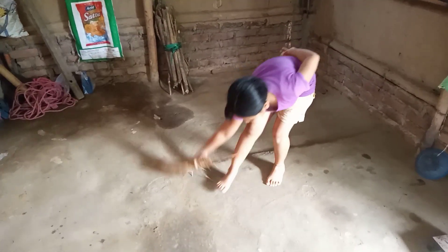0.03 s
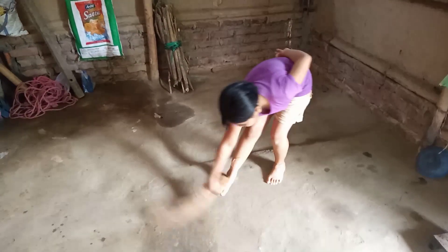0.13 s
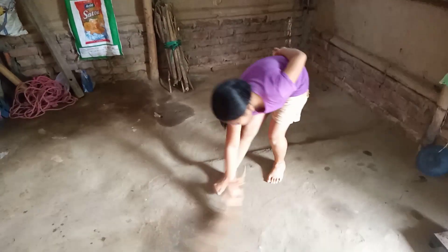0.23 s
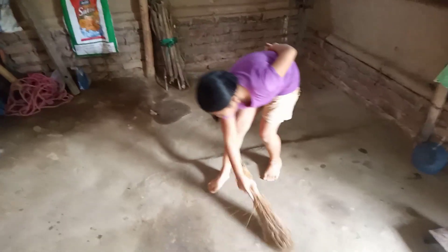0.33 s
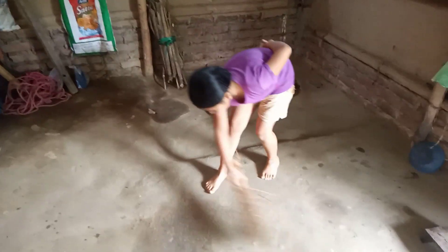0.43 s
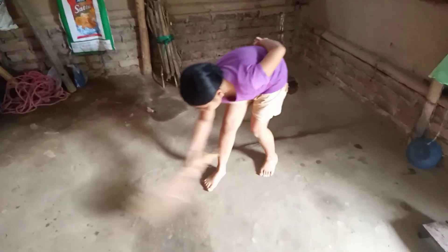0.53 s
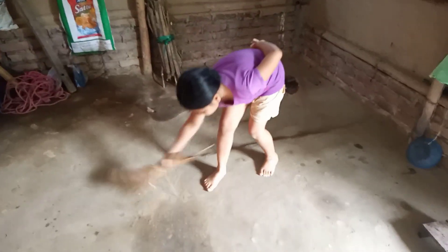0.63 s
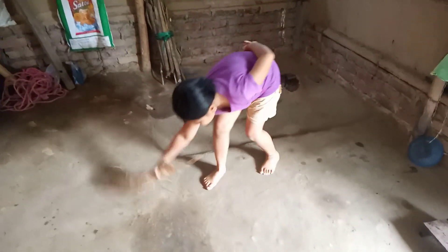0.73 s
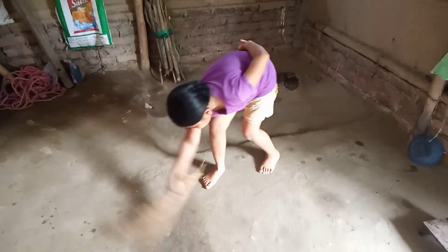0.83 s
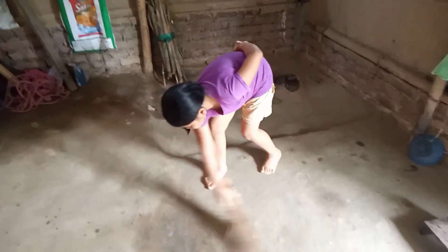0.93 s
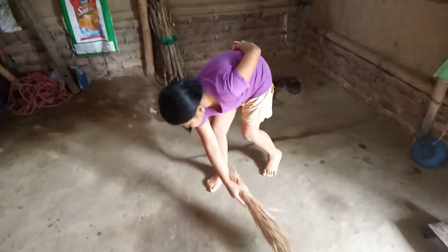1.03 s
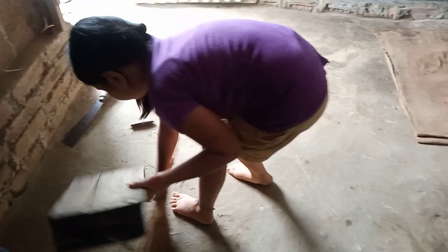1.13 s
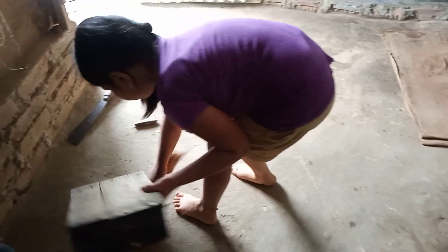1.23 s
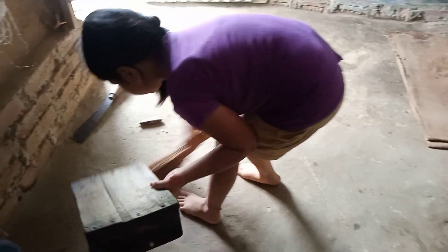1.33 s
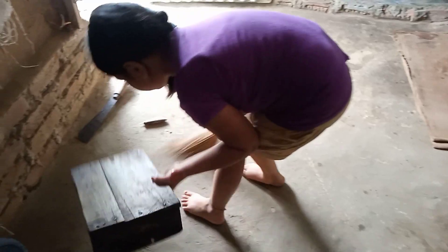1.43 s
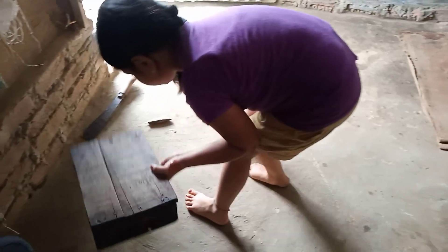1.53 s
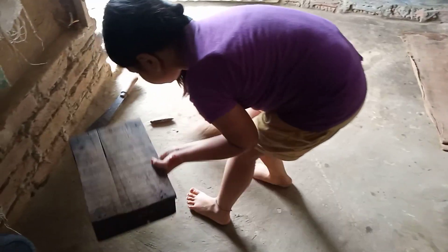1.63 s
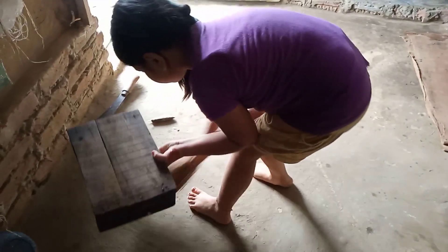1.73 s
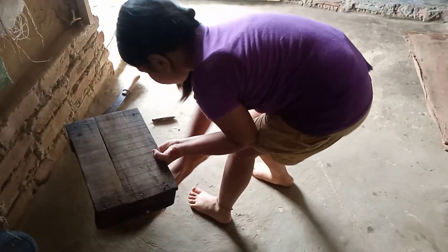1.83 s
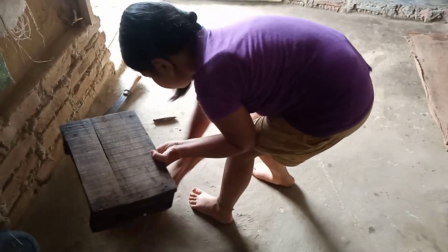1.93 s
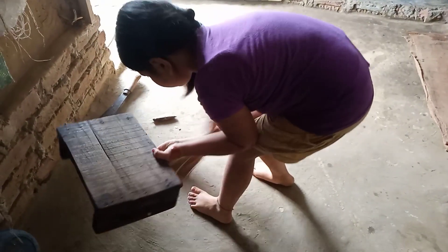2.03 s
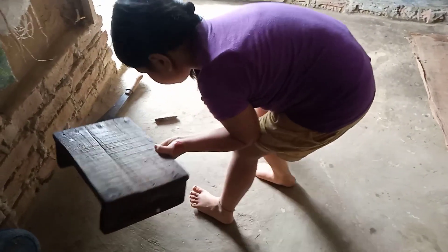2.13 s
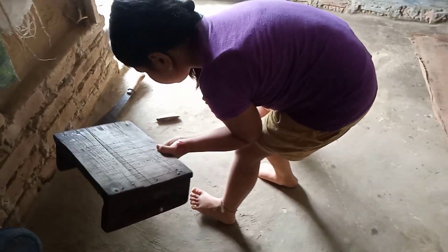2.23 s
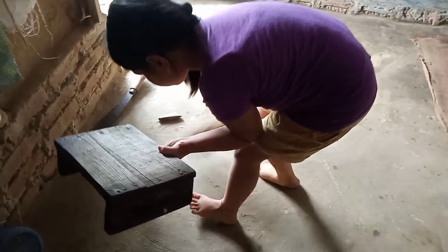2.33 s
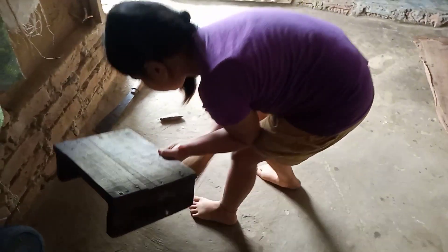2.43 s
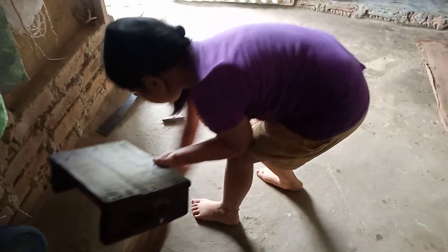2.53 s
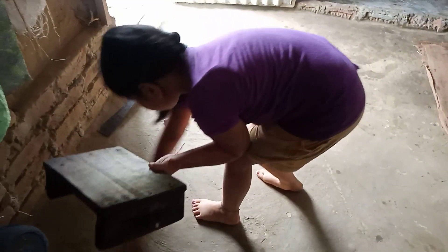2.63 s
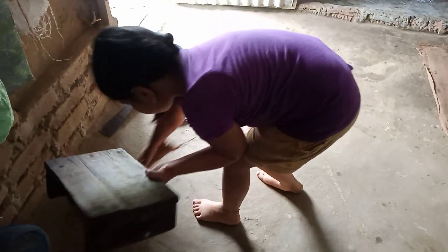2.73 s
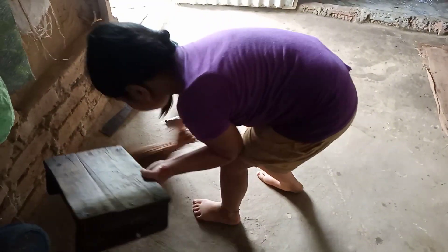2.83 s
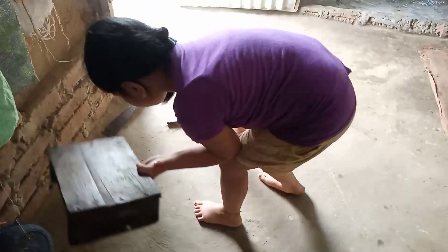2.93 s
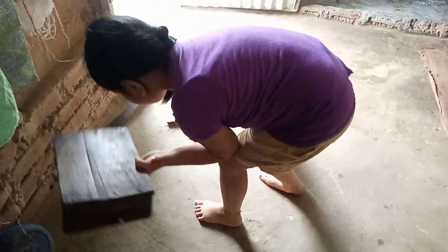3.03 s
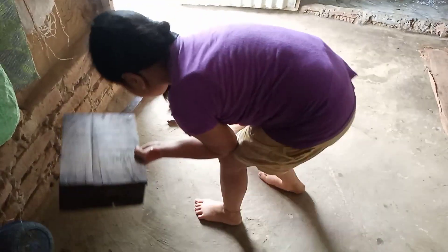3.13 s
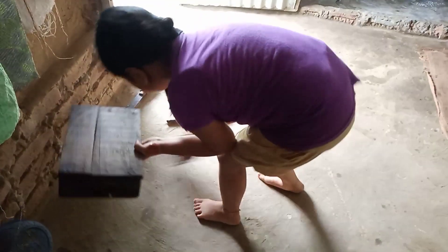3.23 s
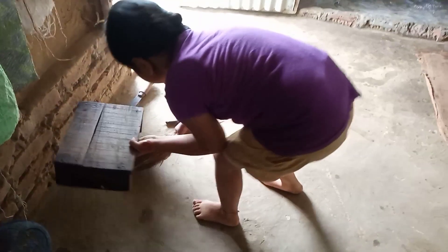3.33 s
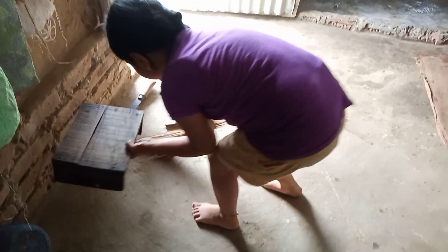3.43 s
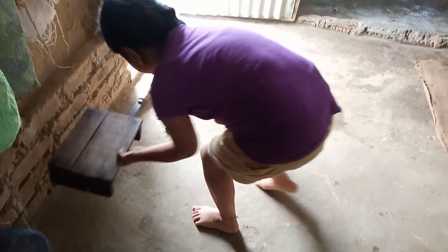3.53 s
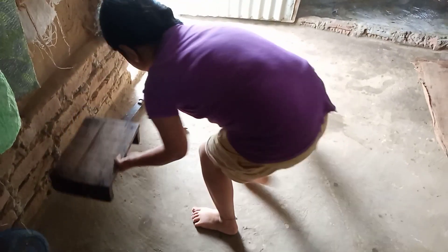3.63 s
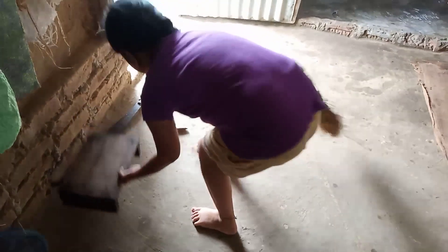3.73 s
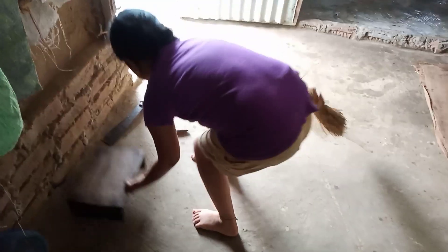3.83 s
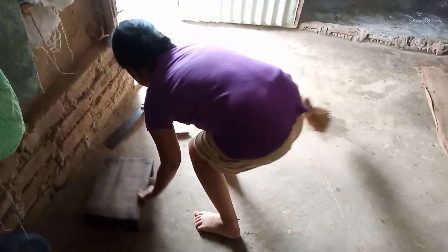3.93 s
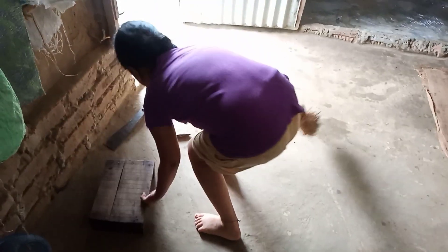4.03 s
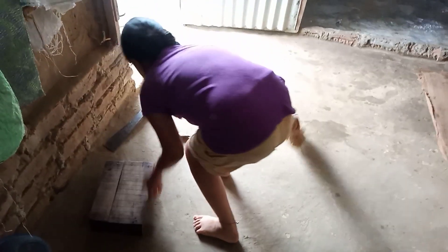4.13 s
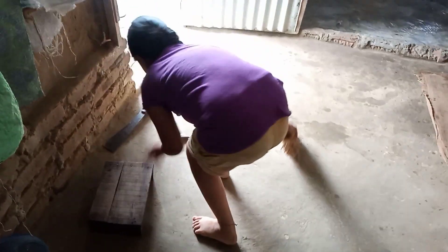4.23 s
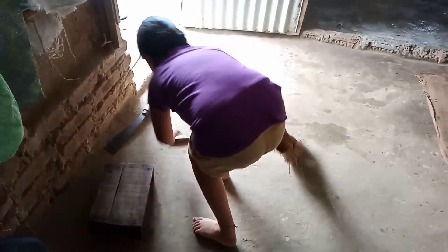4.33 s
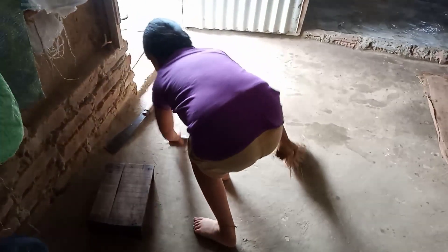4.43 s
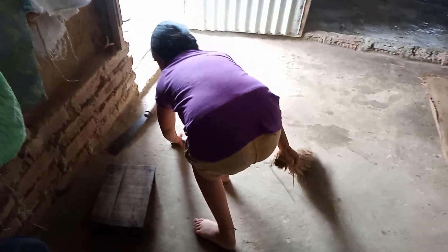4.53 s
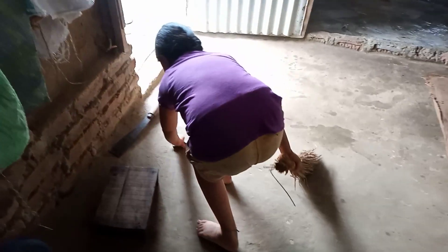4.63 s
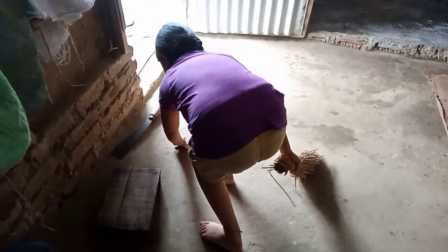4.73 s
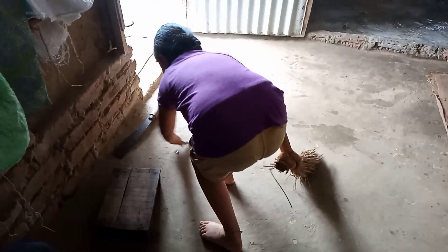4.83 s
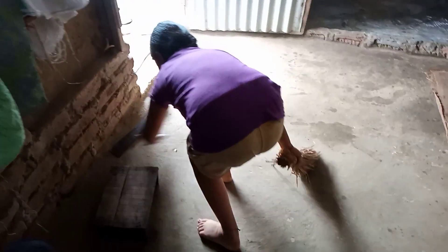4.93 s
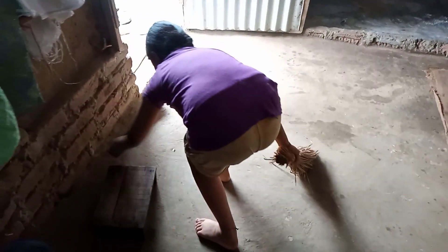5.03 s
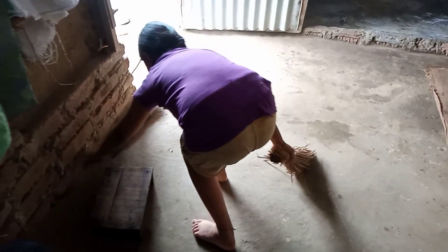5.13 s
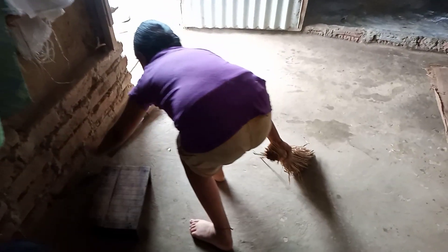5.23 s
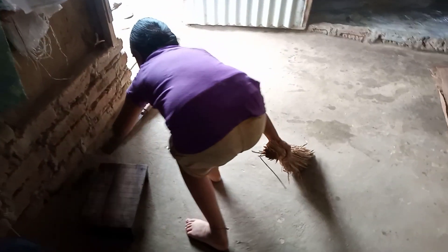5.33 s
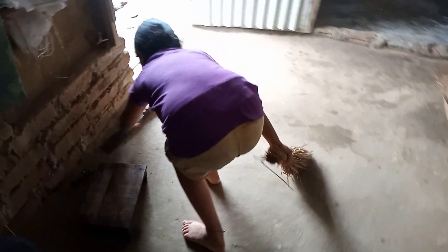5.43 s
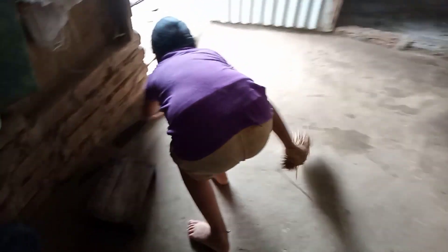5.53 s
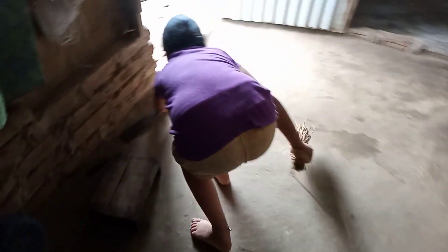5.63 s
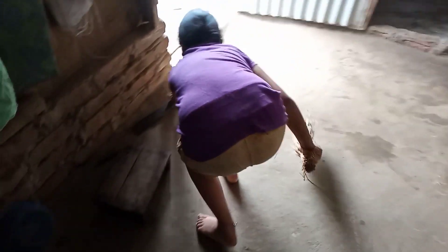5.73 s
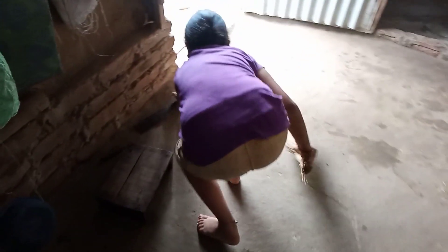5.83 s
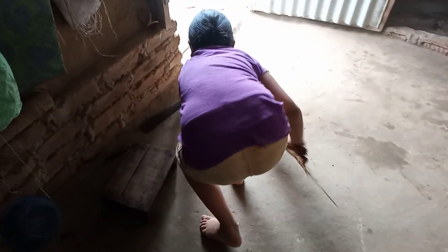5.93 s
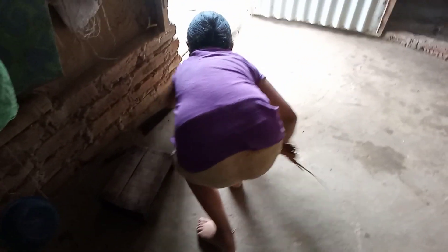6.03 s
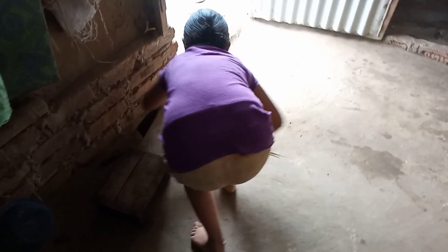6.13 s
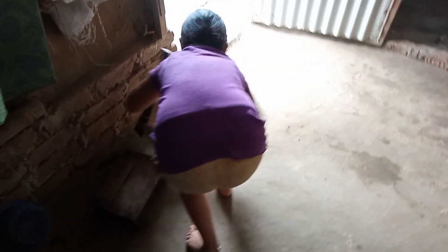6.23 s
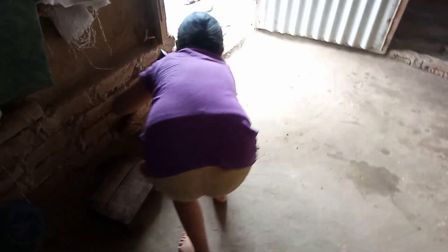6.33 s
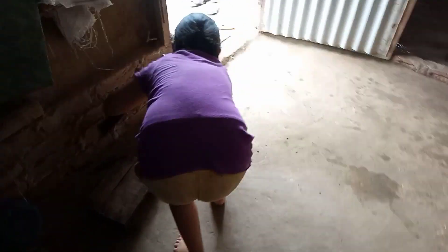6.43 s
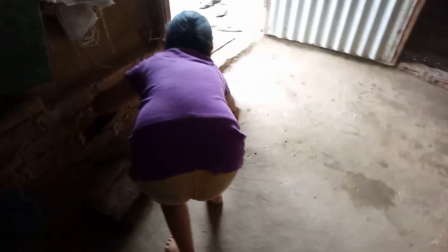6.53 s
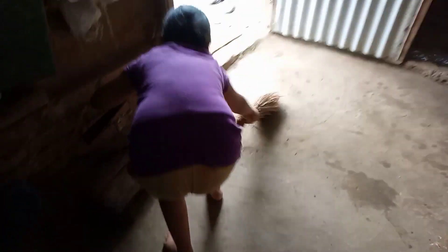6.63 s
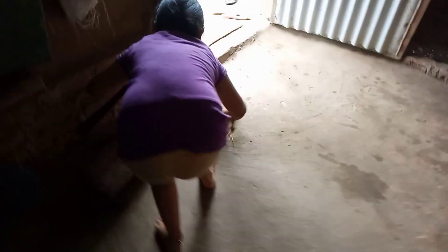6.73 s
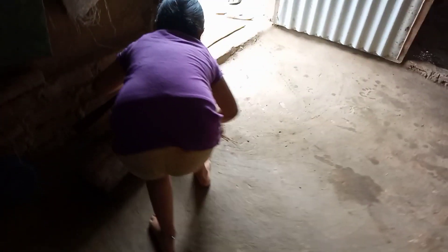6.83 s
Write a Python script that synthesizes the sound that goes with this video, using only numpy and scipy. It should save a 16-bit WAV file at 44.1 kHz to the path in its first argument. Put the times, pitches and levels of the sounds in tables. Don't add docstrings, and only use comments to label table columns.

```python
import sys
import numpy as np
from scipy import signal
from scipy.fft import rfft, irfft
from scipy.io import wavfile
from scipy.ndimage import uniform_filter1d

SR = 44100
rng = np.random.default_rng(int(sys.argv[2]) if len(sys.argv) > 2 else 0)


def put_to_file(sound):
    columns = np.atleast_2d(sound).T
    safe = np.clip(columns, -1, 1)
    whole_steps = np.round(safe * 32767)
    wavfile.write(sys.argv[1], SR, whole_steps.astype(np.int16))


def field_ratio(decibels):
    return 10 ** (np.asarray(decibels, dtype=float) / 20)


N = 303844
SECOND_SHOT_S, SWEEP_ENDS_S = 1.308, 3.93


def unit(x):
    return x / np.sqrt(np.mean(x ** 2))


def band(x, lo_hz, hi_hz):
    sos = signal.butter(3, [lo_hz, min(hi_hz, .45 * SR)], "band", fs=SR, output="sos")
    return unit(signal.sosfilt(sos, x))


def colour(x, spectrum):
    hz, db = np.transpose(spectrum)
    log_hz = np.log(np.fft.rfftfreq(N, 1 / SR) + 1)
    return irfft(rfft(x) * field_ratio(np.interp(log_hz, np.log(hz), db)), N)


def walk(rate_hz):
    size = int(SR / rate_hz)
    return unit(uniform_filter1d(uniform_filter1d(rng.standard_normal(N), size), size))


def add(out, s, x):
    i = int(s * SR)
    out[i:i + len(x)] += x[:max(N - i, 0)]


def strike(modes, contact_ms, db, crack_db, crack_t60, crack_hz, split=0.):
    t = np.arange(SR // 2) / SR
    ring = 0
    for hz, level_db, t60 in modes:
        twin_hz = hz * (1 + split * rng.standard_normal())
        pair = np.sin(2 * np.pi * hz * t) + 1.66 * np.sin(2 * np.pi * twin_hz * t)
        ring = ring + field_ratio(level_db - 60 * t / t60) * pair
    contact_force = np.hanning(int(contact_ms * SR / 1000) + 3)
    ring = signal.fftconvolve(ring, contact_force)[:len(t)]
    grit = rng.standard_normal(len(t)) * field_ratio(-60 * t / crack_t60)
    low_pass = signal.butter(4, min(crack_hz, .45 * SR), fs=SR, output="sos")
    crack = signal.sosfilt(low_pass, grit)
    return field_ratio(db) * (ring / np.abs(ring).max() + field_ratio(crack_db) * crack / np.abs(crack).max())


def tail(x, t60, wet_db, top_hz):
    t = np.arange(SR // 2) / SR
    cloud = rng.standard_normal(len(t)) * field_ratio(-60 * t / t60) * np.minimum(t / 0.0024, 1)
    cloud = signal.lfilter(*signal.butter(2, top_hz, fs=SR), cloud)
    return x + field_ratio(wet_db) * signal.fftconvolve(x, cloud / np.sqrt(np.sum(cloud ** 2)))[:N]


def whistle(hz):
    u = np.linspace(0, 1, len(hz))
    return np.sin(np.pi * u ** .8) * np.sin(2 * np.pi * np.cumsum(hz) / SR)


def chirps(table, hoarse_db):
    out, rasp = np.zeros(N), walk(240)
    for s, length, hz0, hz1, db in table:
        size = int(length * SR)
        wobble = rasp[int(s * SR) - size:][:size]
        pitch_hz = np.linspace(hz0, hz1, size) * (1 + 0.0032 * hoarse_db * wobble)
        add(out, s, field_ratio(db + hoarse_db * wobble) * whistle(pitch_hz))
    return out


# (frequency [Hz], density [dB per Hz])
BRISTLE_SPECTRUM = [(120, -83), (200, -14), (227, -24.5), (263, -18), (607, -20.5), (1150, -5.5),
                    (1400, -3), (3300, 2), (4180, -5), (5590, -22.5), (7350, -18.5), (10000, -35),
                    (15500, -32)]


def bristles(spread_db=2.5, slips_db=-5):
    sizes = np.minimum(rng.exponential(size=N), 4)
    slips = (rng.random(N) < .06) * rng.standard_normal(N) * field_ratio(spread_db * sizes)
    rub = colour(rng.standard_normal(N) + field_ratio(slips_db) * unit(slips), BRISTLE_SPECTRUM)
    fine = band(rub, 5880, 16000)
    coarse = field_ratio(-2) * fine + field_ratio(-9.0) * band(rub, 5660, 10500)
    tips = np.where(np.arange(N) < SWEEP_ENDS_S * SR, fine, coarse)
    return band(rub, 183, 832), band(rub, 1110, 5200), tips


# (time of full pressure [s], press [s], hold [s], hiss level [dB], stalk scrub re hiss [dB])
STROKES = [(.02, 0.09, 0.041, -54, -6.5), (.175, 0.083, 0.17, -32, -14), (.76, 0.2, 0.074, -47, -15.5),
           (.855, 0.091, 0.13, -34, -14), (1.38, 0.15, 0.041, -54.5, -5), (1.5, 0.28, 0.059, -45.5, -8),
           (1.86, 0.017, 0.082, -67.5, 7), (1.975, 0.015, 0.013, -46.5, -8.5),
           (2.07, 0.042, .14, -42.5, -15), (2.73, 0.087, 0.36, -43, -10), (3.235, 0.14, 0.027, -52.5, -24),
           (3.45, .06, 0.11, -49.5, -10.5), (3.58, 0.21, 0.068, -46, -23),
           (3.86, 0.095, 0.036, -56.5, -4.5)]
SHUFFLES = [
    (4.09, .03, 0.016, -60.5, 13),
    (4.58, 0.11, 0.076, -54, -13.5),
    (4.8, 0.1, 0.17, -56, 5),
    (5.05, .1, .3, -56.5, 8),
    (5.34, 0.082, .02, -47, -14),
    (5.7, 0.52, .4, -54.5, 2),
    (6.27, .2, 0.11, -51.5, 1),
    (6.46, 0.2, 0.099, -43, -5),
    (6.6, .1, 0.058, -43, -8.5),
    (6.76, 0.018, .2, -54.5, -27),
]
# (hiss level [dB], scrub level [dB], tips level [dB])
REST = [
    (-57.5, -80, -90),
    (-65.5, -76.5, -73.5),
    (-59.5, -69, -66),
]


def pressure():
    press_db, sag_db_per_s, lift_db_per_s = 22, 13.5, 116
    tips_db, stalks_die, tips_die = -13.5, 1.25, 1.12
    t = np.arange(N) / SR
    stage = (t > SECOND_SHOT_S) * 1 + (t > SWEEP_ENDS_S)
    power = field_ratio(np.transpose(REST)[:, stage]) ** 2
    for s, press, hold, db, scrub_db in list(STROKES) + list(SHUFFLES):
        late = t - s
        fall = press_db * np.maximum(-late / press, 0)
        fall = fall + sag_db_per_s * np.clip(late, 0, hold)
        fall = fall + lift_db_per_s * np.maximum(late - hold, 0)
        levels = [db - fall, db + scrub_db - stalks_die * fall, db + tips_db - tips_die * fall]
        power = power + field_ratio(levels) ** 2
    return np.sqrt(power)


# (time [s], peak level [dB], low part re peak [dB], ringing [Hz], T60 [s])
WOOD_SCRAPES = [
    (1.9735, -47, -16, 2700, 0.69),
    (2.0454, -37.5, 13, 1300, 0.26),
    (4.8125, -31.5, -0.5, 3020, 0.46),
    (5.0055, -38, 7, 1800, 0.43),
    (5.1522, -28.5, -2, 1780, 0.16),
    (5.671, -26, -5, 1480, 0.26),
    (6.2653, -27.5, -2.5, 1530, 0.23),
]
IRON_RASPS = [
    (4.6423, -39.5, -8.5, 1950, 0.16),
    (5.3378, -25.5, 6, 1880, 0.17),
]


def scrapes(low, mid, high):
    out = np.zeros(N)
    t, judder = np.arange(SR // 2) / SR, field_ratio(1.5 * walk(400))
    for table, tip_db in [(WOOD_SCRAPES, -35), (IRON_RASPS, -5.5)]:
        for s, db, low_db, hz, t60 in table:
            part = slice(int(s * SR), int(s * SR) + len(t))
            ring = signal.lfilter(*signal.iirpeak(hz, 12, fs=SR), mid[part])
            grit = (mid + field_ratio(low_db) * low + field_ratio(tip_db) * high)[part] + field_ratio(4.5) * ring
            envelope = field_ratio(db - 14.0 - 60 * t / t60) * np.minimum(t / 0.0035, 1)
            add(out, s, envelope * judder[part] * grit)
    return out


def broom():
    low, mid, high = bristles()
    hiss, scrub, tips = pressure()
    out = hiss * field_ratio(1.0 * walk(33)) * mid
    out = out + scrub * field_ratio(2.3 * walk(24)) * low
    out = out + tips * field_ratio(1.0 * walk(30)) * high
    return out + scrapes(low, mid, high)


# (time [s], peak level [dB], contact [ms])
LEGS = [
    (3.95, -12, 1.5),
    (3.955, -7.5, 0.64),
    (3.961, -6.5, 1.0),
    (4.038, -18, 1.6),
]
DROP = [
    (4.057, -28, .3),
    (4.059, -6.5, 0.51),
    (4.0650, -21, 0.27),
]
# (frequency [Hz], level [dB], T60 [s])
STOOL_TILTED = [(137, 11.5, 0.04), (258, 0.5, 0.11), (591, 3, 0.12), (785, -2.5, 0.16), (1070, -38, 0.11),
                (1210, -47, 5.0), (1373, -32.5, 0.21)]
STOOL_FLAT = [(121.4, -7, 0.28), (180, -9, 0.18), (288, -12.5, 0.19), (398, -1, 0.041), (524.5, 7, 0.077),
              (682, -12, 0.22), (767, -10.5, 0.13), (970, -0.5, 0.022), (1230, -19.5, 0.0229),
              (1390, -16.5, 0.078), (1860, -13, 0.06), (2300, -34.5, .08), (2780, -22, .06)]


def stool():
    out = np.zeros(N)
    for s, db, ms in LEGS:
        add(out, s, strike(STOOL_TILTED, ms, db - 11.5, crack_db=-10, crack_t60=0.066,
                           crack_hz=770, split=0.016))
    for s, db, ms in DROP:
        add(out, s, strike(STOOL_FLAT, ms, db, crack_db=-20.5, crack_t60=0.035,
                           crack_hz=3600, split=0.058))
    return out


# (time [s], peak level [dB], pitch [Hz], contact [ms])
THUDS = [(0.018, -50, 258, 0.29), (1.452, -43.5, 920, 0.38), (2.051, -33, 750, 0.18),
         (3.852, -49.5, 166, 0.28), (4.626, -45.5, 320, 0.36), (4.645, -39, 341, 0.34),
         (4.661, -46, 390, 0.82), (4.694, -45, 285, 0.42), (5.005, -41.5, 270, 0.29),
         (5.179, -30.5, 268, 0.3), (5.195, -34.5, 373, 0.28), (5.299, -31.5, 450, 0.72),
         (5.317, -28, 258, 0.47), (5.343, -26.5, 166, 0.66), (5.359, -35.5, 213, 0.46),
         (5.4, -46, 186, 0.34), (5.437, -31, 258, 0.52), (5.455, -30, 469, 0.5), (5.56, -41, 265, 0.59),
         (5.681, -41, 760, 0.45), (5.969, -33.5, 213, 0.51), (6.114, -34, 217, 0.86),
         (6.232, -41, 190, 0.38), (6.309, -39.5, 780, 0.85), (6.458, -29.5, 600, 0.43)]
# (time [s], peak level [dB], pitch [Hz], T60 [s])
TAPS = [
    (1.36, -63, 355, .15),
    (1.44, -57, 363, 0.11),
    (1.598, -51.5, 650, 0.16),
    (2.053, -39, 1380, 0.11),
    (2.056, -40.5, 699, 0.17),
    (1.859, -53.5, 637, 0.14),
    (2.34, -64, 626, 0.14),
    (4.24, -51.5, 843, 0.2),
]
# (ratio to pitch [1], level [dB], T60 [s])
STICK = [(1.0, 0, .04), (1.55, -3, .05), (2.4, -4, .04), (3.6, -5, .03), (5.3, -9, .025)]


def sticks():
    out = np.zeros(N)
    for s, db, hz, ms in THUDS:
        modes = [(hz * ratio, level_db, t60) for ratio, level_db, t60 in STICK]
        add(out, s, strike(modes, ms, db + 1.5, crack_db=-3, crack_t60=0.034,
                           crack_hz=700 / ms, split=0.065))
    for s, db, hz, t60 in TAPS:
        add(out, s, strike([(hz, 0, t60)], 0.84, db, crack_db=-4, crack_t60=0.038,
                           crack_hz=1200, split=0.044))
    return out


# (time [s], peak level [dB])
CLANG = [
    (6.46, -16.5),
]
# (frequency [Hz], level [dB], T60 [s])
BLADE = [(620.6, 1, 0.22), (1401, -2.5, 0.21), (2055, -3, 0.099), (2287, 6, 0.11), (2860, -13, 0.14),
         (3590, -6.5, 0.13), (4915, -7, 0.25), (6720, -16, 0.13), (8190, -2.5, 0.31), (10550, -17, 0.18),
         (11460, -1.5, 0.092), (13270, -14, 0.17)]
# (time [s], peak level [dB], loudest ring [Hz], grit level [dB])
CLINKS = [
    (5.2852, -27, 1784, 0),
    (5.300, -31, 2310, -3),
    (5.313, -23.5, 2740, -6),
    (5.319, -27.5, 2330, -6),
    (5.339, -25, 924, -12),
    (5.34, -20, 6840, -9),
    (5.346, -30, 1880, -19),
    (4.645, -36.5, 1920, -7.5),
]
# (frequency [Hz], level [dB], T60 [s])
SCRAP = [(2020, -4, 0.05), (2328, -6, 0.091), (2750, -6, 0.037), (3320, -11, 0.056), (4120, 1.5, 0.026),
         (6050, -10, 0.044), (7400, -17, 0.033), (12750, -25, 0.028), (14220, -30, 0.0183)]


def iron():
    out = np.zeros(N)
    for s, db in CLANG:
        add(out, s, strike(BLADE, .02, db, crack_db=-1.5, crack_t60=0.063, crack_hz=4160, split=0.0022))
    for s, db, hz, grit_db in CLINKS:
        modes = [(hz, 0, .045)] + [(mode_hz, level_db - 7, t60) for mode_hz, level_db, t60 in SCRAP]
        add(out, s, strike(modes, .02, db, crack_db=grit_db, crack_t60=0.045,
                           crack_hz=15200, split=0.019))
    return out


# (frequency [Hz], gain [dB])
PORT = [(20, 7.5), (3800, 1), (5500, -12), (7000, 4), (9500, -12), (16000, -13)]


def knocks():
    hits = colour(stool() + sticks() + iron(), PORT)
    hits = tail(hits, t60=0.33, wet_db=-10, top_hz=3400)
    return signal.sosfilt(signal.butter(4, 100, "high", fs=SR, output="sos"), hits)


# (time [s], length [s], start pitch [Hz], end pitch [Hz], level [dB])
PEEPS = [
    (4.918, .075, 790, 770, -44),
    (5.017, .03, 922, 920, -31),
    (5.045, .033, 920, 918, -31.5),
    (5.078, .032, 918, 915, -35),
    (5.15, .03, 920, 910, -44),
    (2.472, .04, 14250, 14250, -73),
    (2.503, .03, 13200, 13200, -73),
]


def squeals():
    return chirps(PEEPS, hoarse_db=-0.8)


# (time [s], level [dB])
CALL = [
    (1.387, -44),
    (1.62, -54),
    (2.063, -40.5),
    (2.334, -51.5),
    (2.817, -40.5),
    (3.582, -39.5),
    (4.324, -38),
    (5.061, -39),
    (5.949, -38),
    (6.673, -35),
]
# (delay [s], start pitch [Hz], end pitch [Hz], glide [s], length [s])
NOTES = [
    (.002, 1550, 880, .012, .032),
    (.069, 1480, 880, .011, .038),
    (.145, 1420, 960, .009, .028),
]
NOTE_DB = [-5, -1.5, -1]
# (delay [s], level [dB])
ECHOES = [
    (.033, -6),
    (0.069, -12),
    (.1, -11.5),
]


def bird():
    out = np.zeros(N)
    paths = [(0.0019, 0.0062)] + list(ECHOES)
    for s, db in CALL:
        for (lag, hz0, hz1, glide, length), note_db in zip(NOTES, NOTE_DB):
            t = np.arange(int(length * SR)) / SR
            note = field_ratio(db + note_db) * whistle(hz1 + (hz0 - hz1) * np.exp(-t / glide))
            for delay, echo_db in paths:
                add(out, s + lag + delay, field_ratio(echo_db) * note)
    return out


# (time [s], third harmonic [Hz], level [dB])
CROW = [
    (4.6, 2000, -110),
    (4.7, 2100, -62),
    (4.78, 2150, -55),
    (4.95, 2180, -63),
    (5.22, 2120, -56),
    (5.38, 2200, -60),
    (5.53, 2150, -58),
    (5.65, 2100, -50),
    (5.74, 2040, -110),
]


def cock():
    s, hz_points, db_points = np.transpose(CROW)
    t = np.arange(N) / SR
    hz, db = np.interp(t, s, hz_points), np.interp(t, s, db_points)
    phase = 2 * np.pi * np.cumsum(hz * (1 + 0.0066 * walk(40))) / SR / 3
    voice = np.sin(3 * phase) + field_ratio(-5.5) * np.sin(2 * phase) + field_ratio(-10) * np.sin(4 * phase)
    return field_ratio(db + 1.5 * walk(30)) * voice


# (time [s], length [s], start pitch [Hz], end pitch [Hz], level [dB])
CHICKS = [
    (4.475, .06, 1900, 2100, -59),
    (6.40, .05, 1900, 2400, -52),
    (6.79, .05, 1850, 2050, -56),
    (6.82, .04, 2100, 2500, -51),
    (6.83, .035, 1950, 2300, -50),
    (6.855, .034, 2300, 2600, -51),
]


def yard():
    return tail(bird() + chirps(CHICKS, hoarse_db=4) + cock(), t60=.5, wet_db=-8, top_hz=7600)


# (frequency [Hz], density [dB per Hz])
AIR = [(15, -57.5), (25, -35), (69, -1), (107, -6), (152, -8.5), (246, -26), (368, -21.5), (445, -46.5),
       (826, -36.5), (1270, -32), (1750, -21.5), (2490, -21), (8810, -40.5), (15500, -63.5)]


def air():
    far, t = colour(rng.standard_normal(N), AIR), np.arange(N) / SR
    rumble_db = np.where(t < SECOND_SHOT_S, -54.5 - 4 * t, -62.5)
    rumble = band(far, 12, 250) + field_ratio(-18.0) * band(far, 73.4, 85)
    hiss = field_ratio(-63 + walk(2.3)) * band(far, 930, 18000)
    return hiss + field_ratio(rumble_db + 0.5 * walk(23)) * rumble


def shots():
    out_s, cut_s, fade_out_s, fade_in_s = 1.06, 1.157, 0.11, 0.054
    t = np.arange(N) / SR
    since = t - SECOND_SHOT_S
    first = field_ratio(-2.5) * np.clip(1 - (t - out_s) / fade_out_s, 0, 1) * (t < cut_s)
    second = field_ratio(2.5 - 0.68 * since) * np.clip(since / fade_in_s, 0, 1)
    return first + second


def scene():
    return (broom() + knocks() + squeals() + yard() + air())[None]


def band_limit(x):
    return signal.sosfilt(signal.butter(12, 16520, fs=SR, output="sos"), x)


def record(dry):
    low_pass = signal.ellip(8, .2, 40, 15550, fs=SR, output="sos")
    mix = signal.sosfilt(low_pass, dry) * shots()
    return band_limit(mix)


dry = scene()
out = record(dry)
put_to_file(out)
```